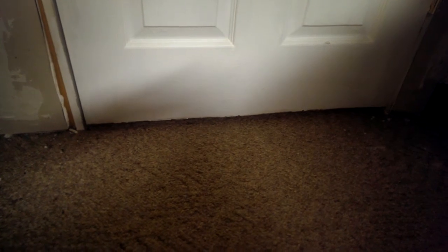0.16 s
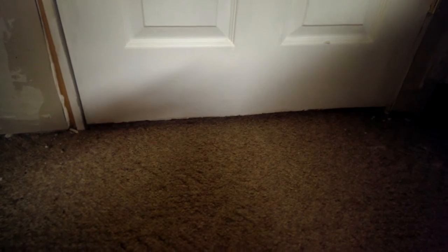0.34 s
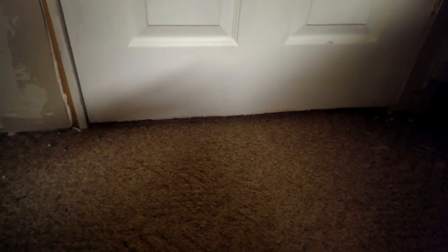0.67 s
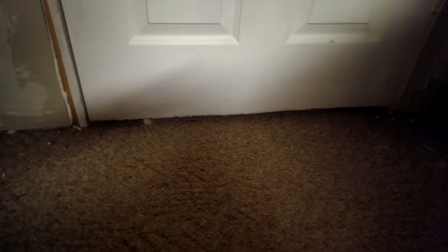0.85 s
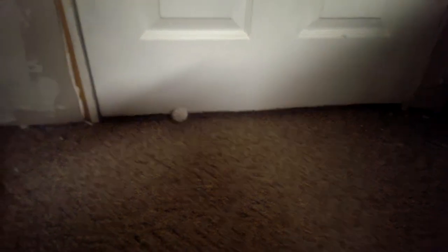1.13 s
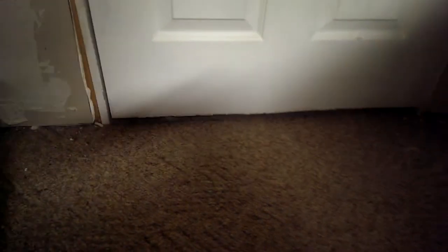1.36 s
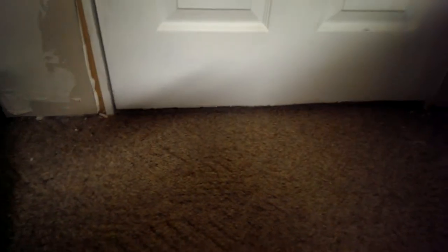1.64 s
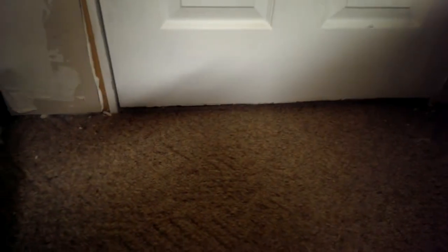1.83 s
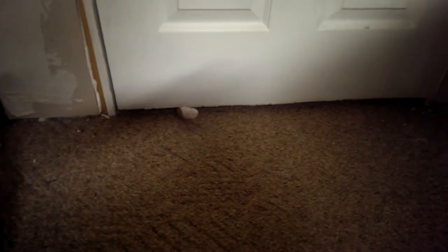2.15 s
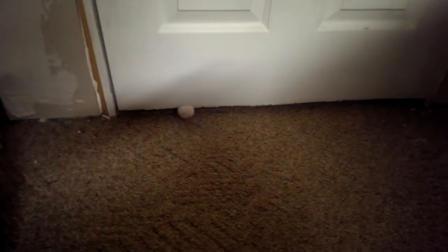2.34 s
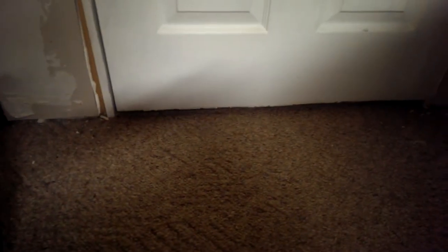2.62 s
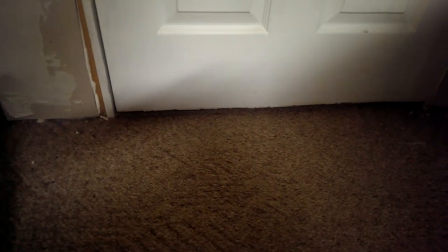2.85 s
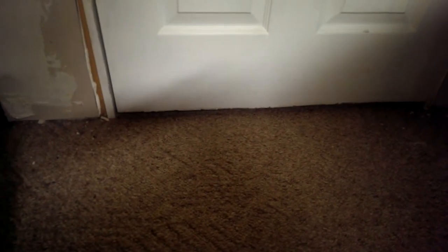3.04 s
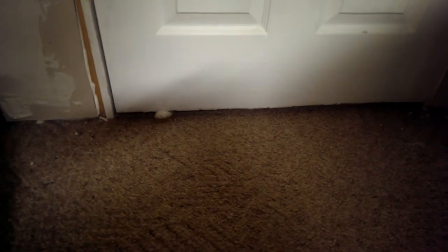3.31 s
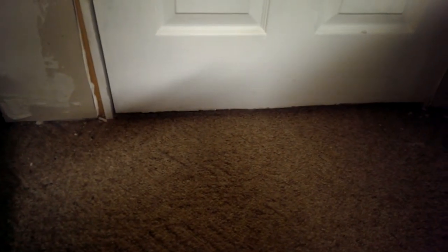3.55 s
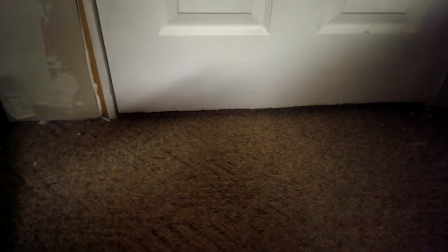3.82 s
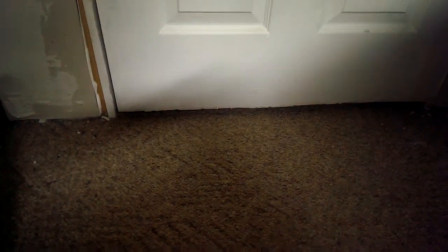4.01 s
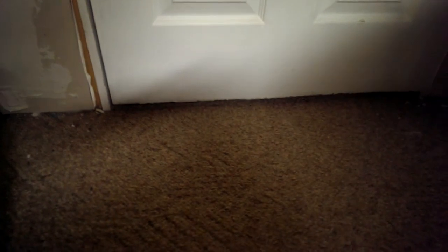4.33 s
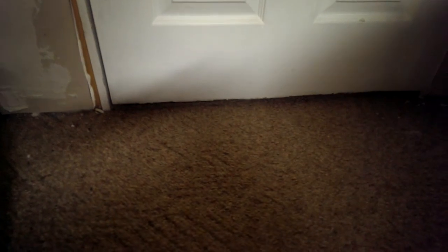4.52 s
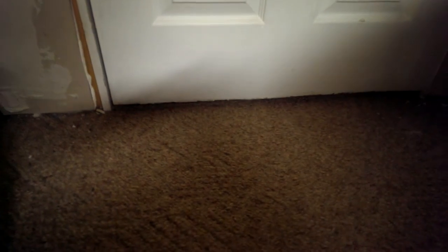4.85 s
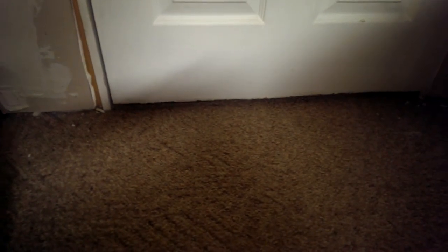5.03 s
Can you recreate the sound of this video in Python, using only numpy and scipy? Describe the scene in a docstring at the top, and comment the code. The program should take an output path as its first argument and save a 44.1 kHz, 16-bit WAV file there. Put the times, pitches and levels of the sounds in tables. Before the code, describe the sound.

A door rattles and thumps softly as a cat claws the carpet underneath it, followed by a close, dry click.

```python
"""A quiet home, where a cat works at a closed door from the far side, reaching through the gap under it.
Its pads rub the wood, and its claws scrape the carpet, snag and tear loose. The door knocks in its
frame, and each shove makes it bend and boom. Near the end comes one dry, sharp tap on the camera's
case, right at the microphones, with a few small ticks around it."""
import sys
import numpy as np
from scipy import signal
from scipy.fft import rfft, irfft, next_fast_len
from scipy.io import wavfile
from scipy.ndimage import uniform_filter1d

SR = 44100
rng = np.random.default_rng(int(sys.argv[2]) if len(sys.argv) > 2 else 0)


def generate_wav(signal):
    """Clip the signal to [-1, 1] and save it as 16-bit WAV at the path in sys.argv[1]."""
    frames = np.transpose(np.atleast_2d(signal))
    scaled = np.clip(frames, -1, 1) * 32767
    pcm = np.round(scaled).astype(np.int16)
    wavfile.write(sys.argv[1], SR, pcm)


N = 227993

# Levels are relative. A mode is a note a thing rings at; t60 is the time it takes to fade by 60 dB.
# the house's rumble under an even hiss: (frequency [Hz], level [dB])
HOUSE_SPECTRUM = [(30, -8), (50, -0.5), (90, -4.5), (137, -17.5), (245, -8), (333, -17), (500, -16),
                  (811, -19.5), (1300, -19.5), (2300, -20.5), (4300, -23), (7000, -28.5), (15500, -32)]
# the hiss and rumble get slightly quieter after the tap: (time [s], level [dB])
HISS_LEVEL = [(0, 1), (4.3, 1), (5.15, -1.5)]
# how alike the two microphones hear them: (frequency [Hz], likeness [0 to 1])
HOUSE_LIKENESS = [(50, 1), (330, 0.62), (650, 0.42), (1300, 0), (4000, 0)]

# paw strokes: (time of top speed [s], length [s], pad on wood [dB], claws on carpet [dB])
PAW_STROKES = [(0.156, 0.067, -62.5, -61.5), (.5, 0.14, -79, -69), (0.891, 0.041, -49, -56.5),
               (1.008, 0.036, -52, -56), (1.094, 0.18, -64.5, -64), (1.3, 0.2, -61, -61),
               (1.48, 0.061, -55, -62.5), (1.648, 0.097, -56.5, -57.5), (1.729, 0.054, -57, -61),
               (1.837, 0.065, -61.5, -65.5), (2.008, .16, -55, -58), (2.168, 0.15, -68, -66),
               (2.476, .11, -57, -56), (2.607, 0.098, -55, -57), (2.836, 0.021, -48, -66),
               (2.905, 0.094, -59, -55), (3.167, 0.092, -60.5, -53.5), (3.316, 0.097, -66.5, -55),
               (3.401, .06, -64, -58.5), (3.527, 0.32, -70, -66), (3.743, 0.054, -69, -58.5),
               (3.853, 0.17, -63, -58.5), (3.914, 0.082, -50, -57), (4.148, 0.05, -44.5, -56.5)]
# pads rubbing wood: (frequency [Hz], level [dB])
PAD_SPECTRUM = [(120, -1), (200, -12.5), (350, 1), (560, -8), (790, 0.5), (950, -9), (1250, -3),
                (1900, -17.5), (3000, -20.5), (8000, -37.5)]
# claws scraping carpet: (frequency [Hz], level [dB])
CARPET_SPECTRUM = [(400, -38), (1000, -9.5), (1550, 4), (2200, 1), (2800, -5.5), (3700, -5), (4800, -7),
                   (5800, -16), (7800, -24), (11200, -30), (16000, -34)]
# modes that rasp under the claws: (frequency [Hz], level [dB], t60 [s])
RASP_MODES = [(1610, 1.5, 0.02), (2056, -5.5, 0.073), (2817, 0, 0.032), (3043, -4.5, 0.11),
              (3694, 9, 0.0095), (4000, 2.5, 0.016), (4400, 2, 0.024)]
# the paw is on our side of the gap, so it is not muffled: (start [s], end [s], rustle level [dB])
PAW_REACHES = [(.97, 1.42, -11.5), (2.014, 2.29, -13), (2.4, 2.67, -14)]
# the fine rustle heard then: (frequency [Hz], level [dB])
RUSTLE_SPECTRUM = [(3000, -98), (7000, 7), (9000, 5), (11200, 6), (13000, -4), (16000, -47)]

# the door hits its frame: (time [s], level [dB], brightness [dB per octave], panel ring [dB])
FRAME_KNOCKS = [(.331, -45.5, -2.5, -7), (0.45, -56.5, -6, -20), (.858, -47, -3, -5),
                (.967, -42, -16.5, -1.5), (1.058, -53, -6.5, 0), (1.256, -50, -11, 3),
                (1.389, -44.5, 2, -19), (1.43, -45, 3, -9), (1.57, -51, 3, -6), (1.802, -54, -4, 0),
                (1.919, -41, -1, 0.5), (2.033, -37, -11, -8), (2.44, -45.5, -14, -3.5),
                (2.579, -48.5, 1.5, -6), (2.663, -52, 4.5, -3), (2.781, -48, -13.5, -12),
                (2.816, -48.5, 4.5, -15), (3.171, -51.5, 6, 0), (3.713, -51.5, -3.5, -4),
                (3.885, -54.5, -3, 5), (4.08, -58, -2, 2)]
# wood hitting wood: (frequency [Hz], level [dB])
WOOD_SPECTRUM = [(90, -8.5), (180, -3.5), (260, -10), (420, 2), (750, 1), (950, -2), (1300, -8), (1700, -4),
                 (2300, -16), (4500, -22.5), (7000, -38), (16000, -47)]
# modes of the door's panels: (frequency [Hz], level [dB], t60 [s])
PANEL_MODES = [(183.8, -4, 0.18), (218, -22, 0.16), (281.4, -10.5, 0.19), (325, -25, 0.075),
               (364.4, -4.5, 0.26), (437.4, 0.5, 0.17), (474, -1, 0.13), (527, -19, 0.35), (638, -18, 0.12),
               (700.4, -3.5, 0.11), (785, -12, 0.13), (1285, -6, 0.088)]
# the paw shoves the door: (time [s], level [dB], contact time [s])
PAW_SHOVES = [(0.337, -60, .007), (0.493, -65, 0.0037), (0.803, -60, 0.0046), (0.971, -35, 0.0095),
              (1.062, -41.5, 0.006), (1.256, -48.5, 0.0093), (1.404, -52, 0.0015), (1.57, -52.5, 0.0085),
              (1.634, -51, 0.023), (1.982, -48, 0.0048), (2.033, -41.5, .0025), (2.203, -50.5, 0.012),
              (2.446, -46, 0.0019), (2.49, -38, 0.0068), (2.822, -46.5, 0.0071), (3.069, -43.5, 0.024),
              (3.133, -45.5, 0.022), (3.267, -52, 0.005), (3.408, -54, 0.02), (3.75, -64, 0.0044),
              (4.192, -63, 0.0012), (4.244, -58.5, 0.0022), (4.866, -60.5, 0.0068)]
# modes of the whole door bending: (frequency [Hz], level [dB], t60 [s])
SWAY_MODES = [(54, -34, 0.97), (71.3, 7.5, 0.41), (88.2, -6.5, 1), (112.9, 5.5, 0.16), (145.8, -12, 0.54),
              (182.1, 0, 0.23), (225, -42, 0.11)]
# a claw snags and slips free: (time [s], level [dB])
CLAW_SNAGS = [(0.993, -48.5), (1.06, -44.5), (1.389, -47.5), (2.05, -48), (2.465, -44), (2.579, -54.5),
              (2.662, -56)]
# the claw tearing loose: (frequency [Hz], level [dB])
CLAW_SPECTRUM = [(300, 14), (900, -17), (2000, 4.5), (2800, -27), (4200, -8.5), (5200, 3.5), (6500, -11.5),
                 (9000, -15), (10800, -7), (13000, -38), (16000, -16)]

# one sharp tap and the ticks around it: (time [s], level [dB], brightness [dB per octave])
CASE_TAPS = [(4.2134, -19.5, 0), (4.215, 0, 0.5), (4.329, -30, -8), (4.333, -51, -14.5),
             (4.352, -34.5, -7.5), (4.413, -36.5, -7)]
# modes of the camera's case: (frequency [Hz], left level [dB], right level [dB], t60 [s])
CASE_MODES = [(119, -34, -14, 0.014), (295, -35, -32, 0.012), (674, -23, -17, 0.016),
              (1030, -8.5, -19, 0.0073), (1420, -13, -7, 0.0077), (1946, -18, -7, 0.005),
              (2580, -46, -14.5, 0.0081), (4010, -28, -14, 0.005)]

# how long the room echoes: (frequency [Hz], t60 [s])
ECHO_T60 = [(100, 0.42), (450, 0.15), (1200, 0.094), (4000, 0.13), (12000, 0.085)]
# how alike the two microphones hear the door: (frequency [Hz], likeness [0 to 1])
DOOR_LIKENESS = [(100, 0.924), (350, 1), (650, 0.83), (1300, 0.39), (2400, 0.043), (8000, 0.031)]
# how far the door's waves are shifted on the left: (frequency [Hz], phase [radians])
DOOR_LEFT_PHASE = [(330, 0), (650, .3), (1300, 1.5), (2500, 2.3)]
# which side hears the door louder: (frequency [Hz], left minus right [dB])
DOOR_BALANCE = [(100, -2), (330, -2.5), (650, -4.5), (2400, -3.5), (4300, -6.5), (9000, 2.5)]


def amp(db):
    """Turns decibels into a number to multiply by."""
    return 10 ** (np.asarray(db) / 20)


def evened(x):
    """Scales a sound to an average power of 1."""
    return x / np.sqrt(np.mean(x ** 2) + 1e-20)


def read(points, hz):
    """Looks up a table between its rows, on a log-frequency scale."""
    f, value = np.transpose(points)
    return np.interp(np.log(hz + 1), np.log(f + 1), value)


def add(mix, start, sound):
    """Mixes a sound in at a start time in seconds."""
    part = mix[:, round(start * SR):][:, :sound.shape[1]]
    part += sound[:, :part.shape[1]]


def tilted(hz, tilt):
    """Harder contact favours high notes: gives the change in dB at each frequency."""
    return tilt * np.log2(np.clip(hz, 180, 2500) / 700)


def colour(x, spectrum, tilt=0, size=2048):
    """Filters a sound to a spectrum, without smearing it earlier in time."""
    hz = np.fft.rfftfreq(size, 1 / SR)
    log_gain = np.log(amp(read(spectrum, hz) + tilted(hz, tilt)))
    mirrored = np.r_[log_gain, log_gain[-2:0:-1]]
    response = np.fft.ifft(np.exp(np.conj(signal.hilbert(mirrored)))).real
    return signal.fftconvolve(x, response[None], axes=1)[:, :x.shape[1]]


def ring(modes, t):
    """One fading sine wave for each mode; neighbours swing opposite ways."""
    hz, db, t60 = np.transpose(modes)[:, :, None]
    direction = (-1) ** np.arange(len(hz))[:, None]
    return direction * amp(db - 60 * t / t60) * np.sin(2 * np.pi * hz * t)


def through(x, modes):
    """Lets a sound set the modes ringing."""
    t = np.arange(min(SR // 2, x.shape[1])) / SR
    response = ring(modes, t).sum(0)
    return evened(signal.oaconvolve(x, response[None], axes=1)[:, :x.shape[1]])


def struck(x, db, size=880):
    """Scales a blow so that its first samples have the given level."""
    return x * amp(db) / np.sqrt(np.mean(x[:, :size] ** 2))


def house_tone(level_db=-63):
    """The house rumbles faintly under an even hiss."""
    size = next_fast_len(N, True)
    hz = np.fft.rfftfreq(size, 1 / SR)
    left, other = rfft(rng.standard_normal((2, size)))
    same = read(HOUSE_LIKENESS, hz)
    right = same * left + np.sqrt(1 - same ** 2) * other
    noise = irfft(np.array([left, right]) * amp(read(HOUSE_SPECTRUM, hz)), size)[:, :N]
    change_db = np.interp(np.arange(N) / SR, *np.transpose(HISS_LEVEL))
    return amp(level_db + change_db) * evened(noise)


def rubbing_power(speedup_share=0.67, jerk_s=0.02, jerk_pad_db=-7, jerk_carpet_db=-6):
    """Power on wood and on carpet: the paw speeds up, then slows faster. It also jerks at each snag."""
    t, power = np.arange(N) / SR, np.zeros((2, N))
    jerks = [(start + jerk_s / 2, jerk_s, db + jerk_pad_db, db + jerk_carpet_db)
             for start, db in CLAW_SNAGS]
    for peak, length, pad_db, carpet_db in PAW_STROKES + jerks:
        near = abs(t - peak) < 2 * length
        offset = (t[near] - peak) / length
        width = np.where(offset < 0, speedup_share, 1 - speedup_share)
        speed = np.exp(-(offset / width) ** 2)
        power[:, near] += (amp([[pad_db], [carpet_db]]) * speed) ** 2
    return power


def grains(per_s, spread_db):
    """Sticking and slipping makes tiny clicks of uneven size."""
    size = amp(spread_db * np.minimum(rng.exponential(1, N), 4))
    slipping = rng.random(N) < per_s / SR
    return size * slipping * rng.standard_normal((2, N))


def paw_strokes(panel_db=-10, rasp_db=-6, catch_db=0.37):
    """Pads rub the panels in small slips; claws catch in the carpet, brighter on our side of the gap."""
    slips, flicks = grains(per_s=1500, spread_db=2.5), grains(per_s=2500, spread_db=1.0)
    catching = evened(uniform_filter1d(rng.standard_normal(N), size=700))
    flicks *= amp(catch_db * catching)
    pad = evened(evened(colour(slips, PAD_SPECTRUM)) + amp(panel_db) * through(slips, PANEL_MODES))
    fibres = evened(evened(colour(flicks, CARPET_SPECTRUM)) + amp(rasp_db) * through(flicks, RASP_MODES))
    t = np.arange(N) / SR
    reaching = sum(amp(db) * ((t > start) & (t < end)) for start, end, db in PAW_REACHES)
    rustle = uniform_filter1d(reaching, size=1500) * evened(colour(flicks, RUSTLE_SPECTRUM))
    on_wood, on_carpet = np.sqrt(rubbing_power())
    return pad * on_wood + (fibres + rustle) * on_carpet


def frame_knocks(rise_s=0.003, rattle_t60=0.07, rebound_s=0.0181, rebound_db=-12, scatter_db=3):
    """The door rattles on its frame and bounces once; each contact spot rings the panels differently."""
    out, t = np.zeros((2, N)), np.arange(SR // 4) / SR
    modes, mode_hz = ring(PANEL_MODES, t), np.array(PANEL_MODES)[:, 0]
    attack = 1 - np.exp(-t / rise_s)
    since_bounce = np.maximum(t - rebound_s, 0)
    rebound = amp(rebound_db - 60 * since_bounce / rattle_t60) * (1 - np.exp(-since_bounce / rise_s))
    chatter = np.hypot(amp(-60 * t / rattle_t60), rebound)
    for start, db, brightness, ring_db in FRAME_KNOCKS:
        burst = colour(rng.standard_normal((2, len(t))) * chatter, WOOD_SPECTRUM, brightness)
        panels = amp(tilted(mode_hz, brightness) + scatter_db * rng.standard_normal(len(modes))) @ modes
        knock = (struck(burst, 0) + struck(panels[None], ring_db)) * attack
        add(out, start, struck(knock, db))
    return out


def door_shoves(scatter_db=1, lean_db=-6.5, lean_rise_s=0.09, lean_fade_db_per_s=58.5):
    """A push sways the door, and a shorter one reaches higher modes. The leaning paw keeps it shaking."""
    out, lean_power = np.zeros((2, N)), np.zeros((1, N))
    t = np.arange(SR) / SR
    modes = ring(SWAY_MODES, t)
    leaning = (1 - np.exp(-t / lean_rise_s)) * amp(lean_db - lean_fade_db_per_s * t)
    for start, db, contact in PAW_SHOVES:
        push = (t / contact * np.exp(-4 * t / contact))[:SR // 20]
        sway = amp(scatter_db * rng.standard_normal(len(modes))) @ modes
        boom = signal.fftconvolve(sway, push)
        add(out, start, struck(boom[None], db, size=1500))
        add(lean_power, start, (amp(db) * leaning[None]) ** 2)
    tremble = through(rng.standard_normal((2, N)), SWAY_MODES) * np.sqrt(lean_power)
    return out + tremble


def claw_snags(rise_s=0.0022, t60=0.037, grain_db=4, rasp_db=1):
    """A claw tears loose in a short, gritty burst."""
    out, t = np.zeros((2, N)), np.arange(SR // 6) / SR
    for start, db in CLAW_SNAGS:
        grit = rng.standard_normal((2, len(t))) * amp(grain_db * rng.standard_normal(len(t)))
        grit *= amp(-60 * t / t60) * (1 - np.exp(-t / rise_s))
        tear = evened(colour(grit, CLAW_SPECTRUM)) + amp(rasp_db) * through(grit, RASP_MODES)
        add(out, start, struck(tear, db))
    return out


def case_taps(left_lag_s=0.00047, rise_s=0.00052, tick_db=-41, tick_t60=0.021):
    """A tap ticks and rings the camera's case; the ringing reaches the right microphone first."""
    out, t = np.zeros((2, N)), np.arange(SR // 16) / SR
    hz, left_db, right_db, t60 = np.transpose(CASE_MODES)[:, :, None]
    age = np.array([np.maximum(t - left_lag_s, 0), t])[:, None]
    fade = amp(np.array([left_db, right_db]) - 60 * age / t60)
    modes = fade * np.sin(2 * np.pi * hz * age) * (1 - np.exp(-age / rise_s))
    tick_fade = amp(tick_db - 60 * t / tick_t60) * amp([[0], [-6]])  # softer on the right
    for start, db, brightness in CASE_TAPS:
        tick = rng.standard_normal((2, len(t))) * tick_fade
        ringing = (amp(tilted(hz, brightness)) * modes).sum(1)
        add(out, start, amp(db) * (ringing + tick))
    return out


def room_echo(x, rise_s=0.0031):
    """A small carpeted room adds a short echo whose high notes die first."""
    hz, t, noise = signal.stft(rng.standard_normal((2, SR // 2)), SR, nperseg=256)
    fade = amp(-60 * t / read(ECHO_T60, hz)[:, None]) * (1 - np.exp(-t / rise_s))
    tail = signal.istft(noise * fade, SR, nperseg=256)[1]
    return signal.fftconvolve(x, tail / np.linalg.norm(tail[0]), axes=1)[:, :N]


def from_door(x):
    """Two microphones hear the door: alike in the bass, mostly louder on the right."""
    size = next_fast_len(N, True)
    hz = np.fft.rfftfreq(size, 1 / SR)
    right, other = rfft(x, size)
    same, pan = read(DOOR_LIKENESS, hz), amp(read(DOOR_BALANCE, hz) / 2)
    left = (same * right + np.sqrt(1 - same ** 2) * other) * np.exp(1j * read(DOOR_LEFT_PHASE, hz))
    return irfft(np.array([left * pan, right / pan]), size)[:, :N]


def scene():
    """Mixes the cat at the door, the close taps, the room's echo and the quiet house."""
    pawing = frame_knocks() + claw_snags() + paw_strokes()
    taps = case_taps()
    door = from_door(amp(2.0) * door_shoves() + amp(-2.5) * pawing + amp(-8) * room_echo(pawing))
    return door + taps + amp(-21) * room_echo(taps) + house_tone()


def record(dry, low_cut_hz=50, high_cut_hz=15800):
    """Trims away the deepest bass and the highest treble."""
    low_cut = signal.butter(3, low_cut_hz, "highpass", fs=SR, output="sos")
    high_cut = signal.firwin(511, high_cut_hz, window=("kaiser", 9), fs=SR)
    return signal.oaconvolve(signal.sosfilt(low_cut, dry), high_cut[None], "same")


dry = scene()
out = record(dry)
generate_wav(out)
```